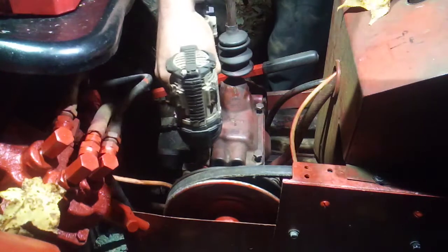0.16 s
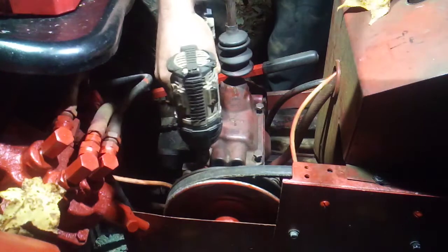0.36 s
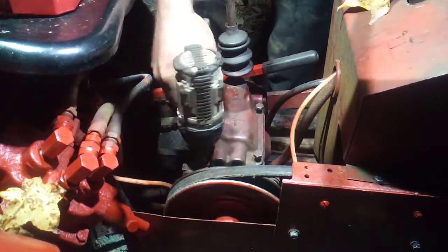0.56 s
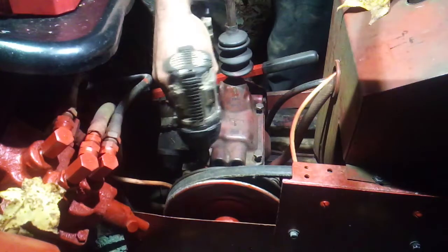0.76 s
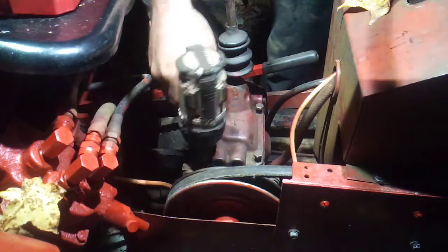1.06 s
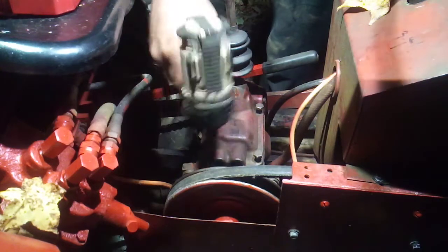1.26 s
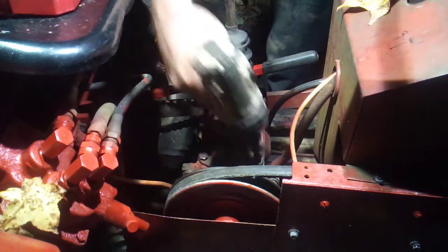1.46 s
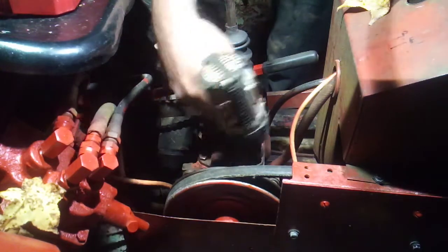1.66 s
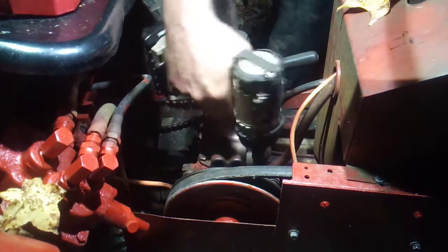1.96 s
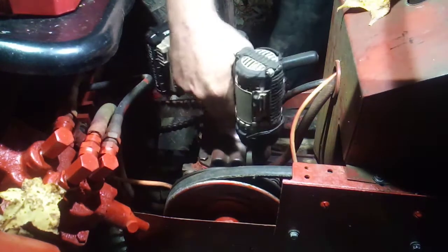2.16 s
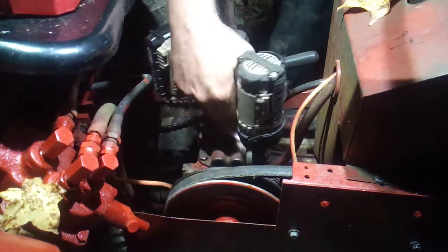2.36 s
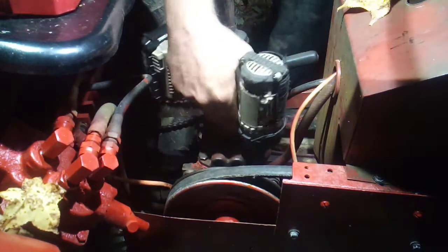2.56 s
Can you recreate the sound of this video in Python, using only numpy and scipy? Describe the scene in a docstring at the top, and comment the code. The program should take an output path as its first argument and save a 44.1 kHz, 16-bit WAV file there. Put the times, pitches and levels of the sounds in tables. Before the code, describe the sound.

Close up in a small workshop, an impact driver's motor whine climbs into rapid steel clanks, twice in quick succession; a pause with light clinks, a rub and knocks, then a longer burst with more hammering.

```python
"""A motor run dies away, then a cordless impact driver squeals faintly and whines up to speed on a steel machine.
Its hammer clanks and the frame rings; after a pause with clinks, a rub and knocks comes a second bolt.
The motor is sine tones over gear clicks and hiss; each blow is a burst of noise plus dying frame tones.
Other contacts are made alike, and echoes and quiet air put it all in a small workshop."""
import sys
import numpy as np
from scipy import signal
from scipy.fft import rfft, irfft
from scipy.io import wavfile
from scipy.ndimage import uniform_filter1d

SR = 44100
rng = np.random.default_rng(int(sys.argv[2]) if len(sys.argv) > 2 else 0)


def persist_wave(psi):
    """Save psi, clipped to +-1, as 16-bit WAV."""
    counts = np.round(np.clip(psi, -1, 1) * 32767).astype(np.int16)
    wavfile.write(sys.argv[1], SR, np.atleast_2d(counts).T)


N = 119070  # samples: 2.7 s

# colour of steel cracking on steel: (frequency [Hz], level [dB])
CRACK_COLOUR = [(60, -24), (200, -38), (530, -13.5), (900, -3.5), (1050, -14.5), (1390, -4.5), (2030, -9.5),
                (2490, -8.5), (2680, -8.5), (3130, -3), (4280, -8.5), (5120, -5.5), (6350, -10),
                (8070, -26), (13400, -31), (15100, -26), (15800, -19)]
# ringing tones of the steel frame: (frequency [Hz], relative level [dB], time to fall 60 dB [s])
FRAME_MODES = [(144, -26.5, 0.45), (231.4, -17, 0.29), (311.5, -21.5, 0.35), (477, -21, .24),
               (506, -19, 0.62), (585.6, -13.5, 0.11), (641, -10, 0.14), (710, 2.5, 0.051),
               (767.5, -0.5, .06), (794, -24, 0.97), (833.7, -1.5, 0.078), (930, -15.5, 0.18),
               (1018, -25, 0.66), (1466, -9, 0.072)]


def undb(db):
    """Turn decibels into a gain."""
    return 10 ** (np.asarray(db) / 20)


def unit(x):
    """Scale a signal to an average (rms) strength of 1."""
    return x / np.sqrt(np.mean(x ** 2) + 1e-20)


def clock():
    """Give the time of every sample in seconds."""
    return np.arange(N) / SR


def follow(points):
    """Draw straight lines through (time [s], value) points, one value per sample."""
    times, values = np.array(points).T
    return np.interp(clock(), times, values)


def colour(x, points):
    """Filter through (frequency [Hz], level [dB]) points, keeping the power of white noise."""
    hz, db = np.array(points).T
    size = 4096
    f = np.maximum(np.fft.rfftfreq(size, 1 / SR), 1)
    gain = unit(undb(np.interp(np.log(f), np.log(hz), db)))
    # folding the cepstrum makes the filter act only after its input (minimum phase)
    cepstrum = irfft(np.log(gain))
    cepstrum[1:size // 2] *= 2
    cepstrum[size // 2 + 1:] = 0
    response = irfft(np.exp(rfft(cepstrum)))
    return signal.fftconvolve(x, response)[:N]


def walk(rate):
    """Drift smoothly at random with spread 1; a higher rate [Hz] drifts faster."""
    k = max(int(SR / rate), 1)
    smooth = uniform_filter1d(rng.standard_normal(N), k)
    return unit(uniform_filter1d(smooth, k))


def add(out, start, x):
    """Mix a sound in at a time in seconds."""
    i = max(int(start * SR), 0)
    out[i:i + len(x)] += x[:N - i]


def bursts(hits, decay_s, rise_s=0.00022):
    """Make contact noise that swells and dies at each (time [s], level [dB])."""
    out, t = np.zeros(N), clock()[:SR // 2]
    shape = np.exp(-t / decay_s) * (1 - np.exp(-t / rise_s))
    for start, db in hits:
        add(out, start, undb(db) * shape * rng.standard_normal(len(t)))
    return out


def ring(hits, modes, scatter=.004, rise_s=0.00058):
    """Ring dying sine tones at each (time [s], level [dB]), slightly retuned by every hit."""
    hz, db, t60 = np.array(modes).T[:, :, None]
    out, t = np.zeros(N), clock()[:SR // 3]
    share = undb(db) / np.linalg.norm(undb(db))
    fade = share * np.exp(-np.log(1000) * t / t60) * (1 - np.exp(-t / rise_s))
    for start, level in hits:
        detune, angle = rng.standard_normal((2, len(hz), 1))
        tones = np.sin(2 * np.pi * hz * (1 + scatter * detune) * t + angle)
        add(out, start, undb(level) * np.sum(fade * tones, axis=0))
    return out


def motor():
    """Motor speed sets the whine's pitch and the gear-click rate; the fan hisses and the gear case rings."""
    # loudness in each trigger pull: (time [s], rattle level [dB], whine level [dB]), before flicker and trims
    pulls = [
        [(0, -47.5, -43), (.065, -61, -80), (.14, -79, -85)],
        [(.172, -49, -65), (.19, -43, -40), (.23, -39, -38.5), (.27, -39, -37), (.31, -38, -32.5),
         (.378, -41.5, -34.5), (.395, -31.5, -49), (.44, -50.5, -60.5), (.52, -52, -79)],
        [(.652, -55.5, -74), (.675, -39, -40), (.73, -45, -33), (.765, -50.5, -54), (.83, -59, -77)],
        [(1.872, -47.5, -83.5), (1.89, -48.5, -53), (1.93, -38.5, -44), (1.955, -44.5, -49),
         (1.99, -37.5, -33.5), (2.04, -35.5, -38), (2.082, -36.5, -35), (2.135, -36, -28.5),
         (2.174, -37, -30.5), (2.196, -35.5, -24), (2.207, -39.5, -58), (2.245, -44, -50.5),
         (2.305, -35.5, -37.5), (2.33, -38.5, -42), (2.39, -43.5, -64), (2.45, -56, -65), (2.49, -63, -77)],
    ]
    # motor speed in each trigger pull: (time [s], speed [turns per s])
    speeds = [
        [(0, 150), (.14, 20)],
        [(.172, 60), (.19, 190), (.22, 292), (.245, 335), (.292, 392), (.33, 413), (.376, 432), (.395, 410),
         (.44, 170), (.52, 40)],
        [(.652, 50), (.675, 200), (.70, 280), (.73, 300), (.83, 40)],
        [(1.872, 50), (1.89, 150), (1.93, 230), (1.99, 295), (2.03, 368), (2.064, 411), (2.085, 425),
         (2.135, 442), (2.2, 460), (2.24, 486), (2.305, 510), (2.39, 260), (2.49, 40)],
    ]
    # tones of motor and gears: [multiples of the motor speed]
    orders = [2.48, 4.96, 7.2, 8, 9.9, 12, 16, 20, 24, 28, 32, 36]
    # strength of those tones, one row per bolt: [dB]
    order_levels = [
        [-24.5, -14, -14.5, -26.5, -26, -15.5, -11.5, -26.5, -28, -37.5, -28.5, -30],
        [-30, -10, -22.5, -18.5, -9.5, -17.5, -33, -31, -33, -30.5, -32, -41],
    ]
    # colour of the gear rattle and fan hiss: (frequency [Hz], level [dB])
    rattle_colour = [(59, -43.5), (100, -21.5), (163, -20.5), (307, -4), (380, -25), (450, -12), (522, -16),
                     (568, -10), (832, -2), (1070, -12), (1470, -5.5), (2610, -13), (2900, -3), (3370, -6),
                     (3990, -4), (6490, -6), (8190, -19), (12800, -28), (15800, -17)]
    second_bolt_s = 1.5
    full_speed = 430  # turns per second
    whine_law = .8  # how strongly the whine grows with speed
    clicks_db, air_db, gear_scatter_db = -4.5, -2.5, 5
    case_hz, case_width_hz, case_db = 4400, 1000, (-36.5, -2)  # one case level per bolt
    out, t = np.zeros(N), clock()
    for speed_points, pull in zip(speeds, pulls):
        s, rattle_db, whine_db = np.array(pull).T
        bolt = int(s[0] > second_bolt_s)
        on = (t >= s[0]) & (t < s[-1])
        speed = follow(speed_points) * (1 + .002 * walk(120))  # slight shaft wobble
        turns = np.cumsum(speed) / SR

        whine = np.zeros(N)
        for order, db in zip(orders, order_levels[bolt]):
            flicker = undb(db + 1.5 * walk(90)[on])
            whine[on] += np.sqrt(2) * flicker * np.sin(2 * np.pi * order * turns[on])
        whine *= undb(np.interp(t, s, whine_db)) * (speed / full_speed) ** whine_law

        teeth_per_turn = orders[1]
        teeth = np.diff(np.floor(turns * teeth_per_turn), prepend=0)
        uneven = unit(rng.standard_normal(N) * undb(gear_scatter_db * rng.standard_normal(N)))
        # the factor gives the sparse clicks strength 1 at full speed
        clicks = teeth * uneven * np.sqrt(SR / (teeth_per_turn * full_speed))
        rattle = undb(clicks_db) * clicks + undb(air_db) * rng.standard_normal(N)
        rattle *= undb(np.interp(t, s, rattle_db) + 2.26 * walk(160))

        sound = colour(rattle * on, rattle_colour) + whine
        case = signal.lfilter(*signal.iirpeak(case_hz, case_hz / case_width_hz, fs=SR), sound)
        out += sound + undb(case_db[bolt]) * case
    return out


def hammer():
    """Steel cracks on steel and the bolt passes each blow into the frame and its panels."""
    # hammer blows and socket rattles: (time [s], crack level [dB], frame level [dB]), before the trims below
    blows = np.array([(0.393, -21, -31), (0.4069, -16, -44), (0.4109, -14, -24.5), (0.4146, -11.5, -44),
                      (0.4189, -24.5, -46), (0.4219, -18, -29), (0.4266, -18, -43), (0.4933, -29.5, -31.5),
                      (0.5023, -27, -46), (0.6534, -34.5, -52), (0.6704, -27, -34.5), (0.6764, -27.5, -34),
                      (0.7078, -19, -26), (0.7299, -12, -31.5), (0.7339, -18, -50), (0.7392, -11.5, -36.5),
                      (0.7419, -23, -35), (0.7474, -23.5, -59), (0.7759, -24.5, -31), (2.2119, -23, -35.5),
                      (2.2146, -12, -36.5), (2.2209, -20, -33.5), (2.2284, -41, -28.5), (2.3341, -10, -36),
                      (2.3369, -20.5, -43.5), (2.3406, -21, -25), (2.3612, -11, -30.5), (2.3649, -20, -29),
                      (2.3751, -10.5, -39), (2.3824, -19, -26), (2.4464, -29.5, -42)])
    # dense, quickly damped ringing of the panels: (frequency [Hz], level [dB])
    panel_colour = [(40, -47.5), (90, -26.5), (125, -11), (175, -12.5), (235, -1.5), (310, -3), (390, -13),
                    (520, -9.5), (730, 1), (870, -3.5), (1050, -7), (1500, -7), (2500, -30.5),
                    (8000, -64.5)]
    crack_hits, frame_hits = blows[:, [0, 1]], blows[:, [0, 2]]
    crack = colour(bursts(crack_hits, decay_s=0.0027), CRACK_COLOUR)
    frame = ring(frame_hits, FRAME_MODES)
    # the panels take a moment to build up
    panels = colour(bursts(frame_hits, decay_s=0.015, rise_s=0.0024), panel_colour)
    return undb(-5) * crack + undb(1.5) * frame + undb(-3) * panels


def squeal():
    """Pulsed current makes the windings sing for a moment just before the motor turns."""
    # steady high tones: (frequency [Hz], level [dB])
    partials = [(3900, -0.5), (7800, -4), (11700, -28)]
    start_s, length_s, level_db = 0.15, 0.013, -59.5
    t = clock()
    swell = np.sin(np.pi * np.clip((t - start_s) / length_s, 0, 1))
    tones = sum(undb(db) * np.sin(2 * np.pi * hz * t) for hz, db in partials)
    return undb(level_db) * swell * tones


def knocking():
    """The tool knocks the machine: a bright tick, a low thud and a ringing frame."""
    # knocks: (time [s], tick level [dB], frame level [dB], thud level [dB]), before the trims below
    knocks = np.array([(0.147, -41.5, -54.5, -81), (.633, -32.5, -69.5, -73), (1.012, -54, -47.5, -75),
                       (1.064, -70, -83, -65), (1.097, -54.5, -79, -70.5), (1.107, -56, -78, -59.5),
                       (1.1234, -50, -64, -64.5), (1.138, -52, -66, -70), (1.286, -71, -77.5, -80),
                       (1.39, -55, -72, -86.5), (1.70, -37, -51, -49.5), (1.715, -19.5, -42.5, -57),
                       (1.7222, -15, -27, -33), (1.729, -22.5, -51, -35), (1.854, -39, -81, -93),
                       (1.872, -31, -85, -76), (1.883, -29, -58, -38.5)])
    # colour of the low thud: (frequency [Hz], level [dB])
    thud_colour = [(30, -44), (70, -23.5), (150, -15), (230, 0.5), (300, 0.5), (420, -16), (650, -10.5),
                   (900, -15), (1400, -11.5), (2500, -28.5), (6000, -58)]
    tick = colour(bursts(knocks[:, [0, 1]], decay_s=0.0026), CRACK_COLOUR)
    thud = colour(bursts(knocks[:, [0, 3]], decay_s=0.0098), thud_colour)
    frame = ring(knocks[:, [0, 2]], FRAME_MODES)
    return undb(-12) * tick + undb(3.5) * thud + frame


def clinking():
    """The socket touches steel: its own short tones ring, with a crack, a dull body and the frame."""
    # touches: (time [s], socket level [dB], frame level [dB]), before the trims below
    clinks = np.array([(1.428, -40.5, -50), (1.431, -31, -38.5), (1.475, -49, -45)])
    # ringing tones of the socket: (frequency [Hz], relative level [dB], time to fall 60 dB [s])
    socket_modes = [(1500, -23, 0.025), (2950, -15, 0.051), (3370, -3.5, 0.016), (3648, -3.5, 0.021),
                    (4180, -9, 0.013), (4470, -0.5, 0.017), (4990, 7, 0.017), (5600, -1, 0.015),
                    (6200, -24, 0.028)]
    # colour of the dull body of a clink: (frequency [Hz], level [dB])
    clink_colour = [(60, -43.5), (170, -22), (240, 1.5), (330, -2.5), (450, -11), (750, 0.5), (1100, -5.5),
                    (2500, -26.5), (6000, -57)]
    socket_hits, frame_hits = clinks[:, [0, 1]], clinks[:, [0, 2]]
    socket = ring(socket_hits, socket_modes, scatter=0.0016, rise_s=0.00025)
    crack = colour(bursts(socket_hits, decay_s=.003), CRACK_COLOUR)
    body = colour(bursts(frame_hits, decay_s=0.0098), clink_colour)
    frame = ring(frame_hits, FRAME_MODES)
    return undb(6) * socket + undb(-6) * crack + undb(-2.5) * body + frame


def grip():
    """The plastic grip ticks: a short burst of coloured noise."""
    # ticks: (time [s], level [dB])
    ticks = [(.9825, -52)]
    # colour of the plastic: (frequency [Hz], level [dB])
    plastic_colour = [(200, -30), (1400, -7), (2000, 0.5), (3100, -0.5), (3800, -13), (6000, -18),
                      (8000, -57)]
    return colour(bursts(ticks, decay_s=0.0094), plastic_colour)


def rub():
    """Dull friction noise swells as the tool is brought down on the bolt."""
    # loudness of the rub: (time [s], level [dB])
    rub_level = [(1.58, -72), (1.64, -59.5), (1.70, -55), (1.73, -48.5), (1.76, -90)]
    # colour of the rub: (frequency [Hz], level [dB])
    rub_colour = [(60, -44), (150, -17), (280, 5.5), (450, -1.5), (800, -3), (1300, -13), (2500, -52)]
    t = clock()
    on = (t > rub_level[0][0]) & (t < rub_level[-1][0])
    return colour(rng.standard_normal(N), rub_colour) * undb(follow(rub_level)) * on


def workshop(x, room_db):
    """Add quick reflections inside the machine, then a room tail that fades at its own pace in each band."""
    # workshop echo: (frequency [Hz], level [dB], time to fall 60 dB [s])
    echo_bands = [(60, -2.5, .7), (126, 3.5, 0.77), (216, -2, 0.42), (358, 0.5, 0.48), (800, -11.5, 0.49),
                  (1980, -13, 0.39), (4960, -25, 0.87), (8000, -21, 0.55), (14750, -24.5, 0.16)]
    t = clock()[:SR]
    hz, db, t60 = np.array(echo_bands).T
    f = np.log(np.maximum(np.fft.rfftfreq(SR, 1 / SR), 1))
    noise = rfft(rng.standard_normal(SR))
    early = rng.standard_normal(SR) * np.exp(-t / 0.013) * (t > .001)
    echo = undb(-11) * unit(early)
    # each row of the identity matrix picks out one band
    for k, share in enumerate(np.eye(len(hz))):
        band = irfft(noise * np.interp(f, np.log(hz), share))
        fade = np.exp(-np.log(1000) * t / t60[k]) * (1 - np.exp(-t / 0.0041))
        echo += undb(db[k] + room_db) * band * unit(fade)
    return x + signal.fftconvolve(x, echo / np.sqrt(SR))[:N]


def hollow_hiss():
    """Faint, flickering coloured noise passes while the tool is lifted across."""
    # loudness of the hiss, before flicker: (time [s], level [dB])
    hiss_level = [(1.21, -84.5), (1.28, -73), (1.42, -67), (1.54, -63.5), (1.62, -72), (1.72, -68.5),
                  (1.85, -77)]
    # hollow colour with peaks and dips: (frequency [Hz], level [dB])
    hiss_colour = [(200, -3), (700, -12.5), (1150, 6), (1650, -14), (2200, 6.5), (2750, -11), (3300, 3),
                   (3850, -8), (4500, 5), (5100, -14.5), (5600, -16), (6100, -26), (6600, -16), (7500, -31)]
    return colour(rng.standard_normal(N), hiss_colour) * undb(follow(hiss_level) + 3.1 * walk(28))


def background():
    """Quiet workshop air: steady coloured noise that slowly drifts in level."""
    # colour of the air: (frequency [Hz], level [dB])
    air_colour = [(20, -24), (70, -2.5), (140, 0.5), (280, -16), (500, -9.5), (780, -5), (1100, -13),
                  (2200, -19), (4500, -24), (6500, -32), (9000, -41.5), (15800, -44.5)]
    return colour(rng.standard_normal(N), air_colour) * undb(-72 + 3.6 * walk(2))


def scene():
    """Put the driver and its handling in the room, over the background."""
    driver = workshop(motor() + squeal() + hammer(), room_db=0)
    handling = workshop(knocking() + clinking() + grip() + rub(), room_db=-4.5)
    return (driver + handling + hollow_hiss() + background())[None]


def record(dry):
    """Cut the top of the treble above 15.9 kHz with a steep low-pass filter."""
    return signal.sosfilt(signal.ellip(10, .2, 80, 15900, fs=SR, output="sos"), dry)


dry = scene()
out = record(dry)
persist_wave(out)
```